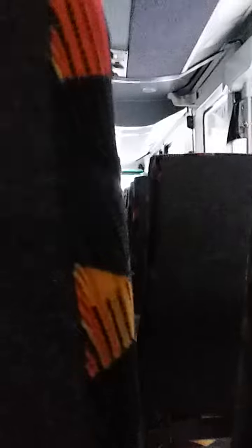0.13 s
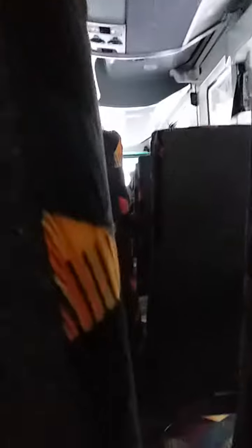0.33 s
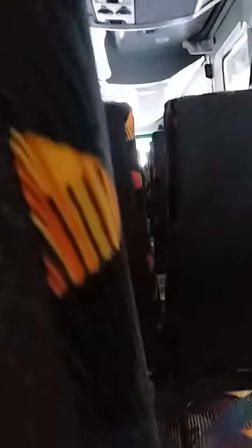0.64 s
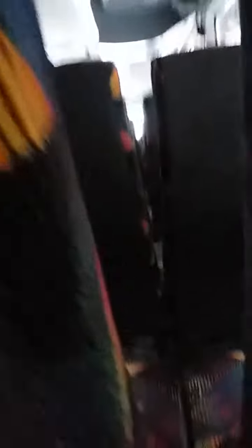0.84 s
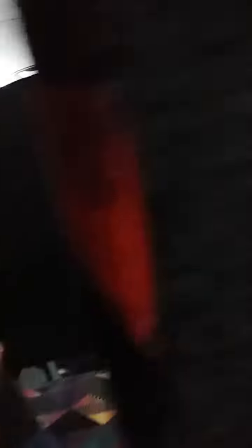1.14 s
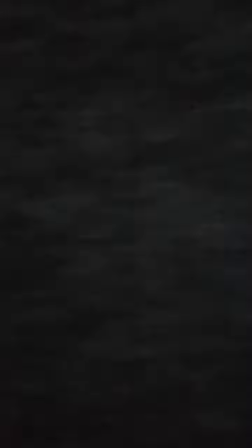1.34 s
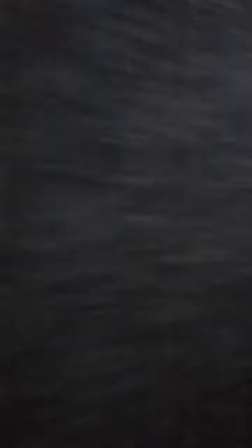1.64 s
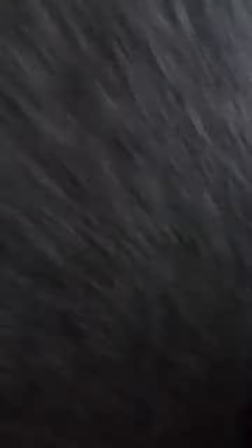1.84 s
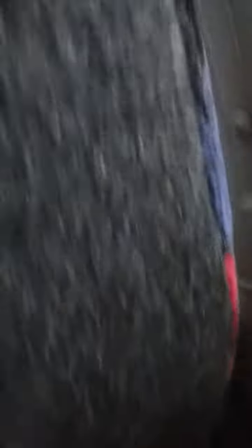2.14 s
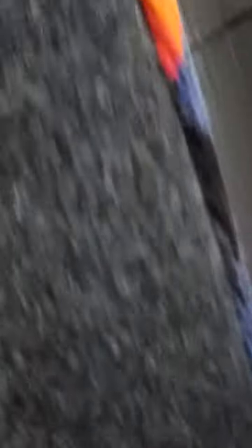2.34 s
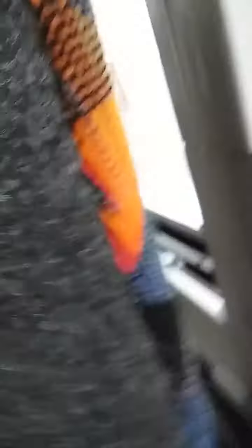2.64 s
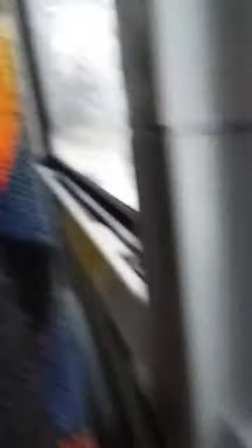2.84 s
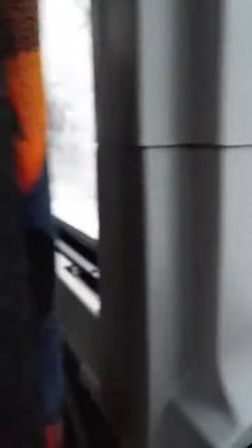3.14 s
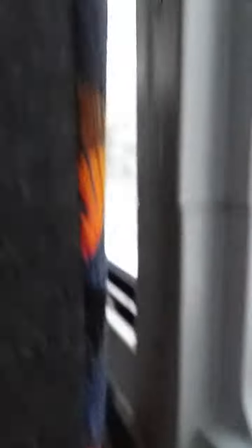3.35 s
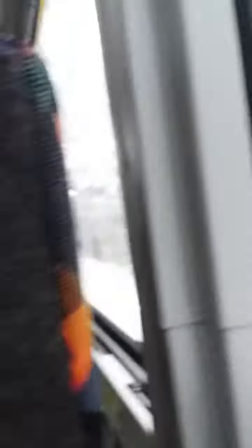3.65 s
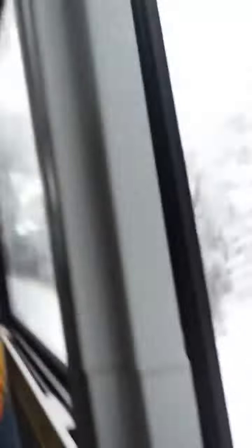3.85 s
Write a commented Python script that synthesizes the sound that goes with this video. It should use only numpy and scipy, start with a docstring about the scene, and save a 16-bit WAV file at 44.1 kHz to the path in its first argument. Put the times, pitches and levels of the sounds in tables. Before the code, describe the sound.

Steady deep engine drone and road rumble inside a coach, with close fabric brushing and small rattles

```python
"""Inside a moving coach, on a left-right microphone pair: silence for about a third of a second, then a fade-in.
A six-cylinder diesel drones as sine orders, with noise for faint whines, road rumble and rushing air.
Cloth brushes a seat close by throughout, as grainy noise. A seat knocks at 1 s and metal clinks at 1.2 s,
both as decaying modes; dry ticks are noise bursts. Thin squeaks of resonant noise come from 2.3 to 3 s,
then a firm rub rasps at 3.3 s and the last ticks fall at 3.6 s."""
import sys
import numpy as np
from scipy import signal
from scipy.io import wavfile

SR = 44100
rng = np.random.default_rng(int(sys.argv[2]) if len(sys.argv) > 2 else 0)


def bounce(signal):
    """Save signal as a 16-bit WAV file at the path given by the first command-line argument."""
    frames = np.transpose(np.atleast_2d(signal))
    limited = np.clip(frames, -1, 1)
    pcm = np.round(limited * 32767).astype(np.int16)
    wavfile.write(sys.argv[1], SR, pcm)


N = 176400
TIME = np.arange(N) / SR


def from_db(db):
    """Decibels to gain."""
    return 10 ** (np.asarray(db) / 20)


def rms_one(x):
    """Scale to unit power."""
    return x / np.sqrt(np.mean(x ** 2) + 1e-20)


def in_time(rows):
    """Read a table of times and values at every sample."""
    return np.interp(TIME, *np.transpose(rows))


def at_hz(points, hz):
    """Read a table on a log-frequency axis."""
    table_hz, value = np.transpose(points)
    return np.interp(np.log(hz), np.log(table_hz), value)


def pan(db):
    """Left and right gains for a left-minus-right difference, at equal power."""
    return rms_one(from_db(np.array([[db], [-db]]) / 2))


def drift(rate):
    """Smooth chance with spread 1; a higher rate (per s) wanders faster."""
    step = 40  # samples between control points
    r = np.exp(-2 * np.pi * rate * step / SR)
    chance = rng.standard_normal(N // step + 2002)
    slow = signal.lfilter([1], [1, -2 * r, r * r], chance)[2000:]  # drop the filter's settling
    return np.interp(np.arange(N) / step, np.arange(len(slow)), rms_one(slow))


def spread(mid, side, alike):
    """Left and right noise whose likeness (correlation) is alike."""
    return np.sqrt(1 + alike) * mid + np.sqrt(1 - alike) * side * [[1], [-1]]


# Likeness of left and right at the microphone pair: pitch_hz, likeness (1 = identical, 0 = unrelated)
LEFT_RIGHT_LIKENESS = [(60,0.95),(130,0.93),(290,0.84),(640,.43),(1410,-0.028),(3100,0.037),(15000,-0.063)]


def banded_noise(spectrum, flicker_db, balance):
    """Narrow bands of stereo noise, each with its own level, flicker and likeness; rms 1."""
    third_octaves = 22 * 2 ** (np.arange(25) / 3)
    edges = np.r_[third_octaves, np.arange(6500, 17000, 1000)]
    white = rng.standard_normal((2, 2, N))
    out = 0
    for k, (low, high) in enumerate(zip(edges, edges[1:])):
        band = signal.butter(3, [low, high], "band", fs=SR, output="sos")
        mid, side = signal.sosfilt(band, white[k % 2])  # neighbouring bands use different noise
        hz = np.sqrt(low * high)
        alike = np.clip(at_hz(LEFT_RIGHT_LIKENESS, hz), -1, 1)
        pan_db = 0 if balance is None else at_hz(balance, hz)
        gain = from_db(at_hz(spectrum, hz) + flicker_db * drift(13.1)) * pan(pan_db)
        out = out + gain * spread(mid, side, alike)
    return rms_one(out)


def resonant_noise(hz, width_hz, alike=0):
    """Stereo noise twice through one resonance; rms 1."""
    r = np.exp(-np.pi * width_hz / SR)
    b, a = [1, 0, -1.08], [1, -2 * r * np.cos(2 * np.pi * hz / SR), r * r]
    once = signal.lfilter(b, a, rng.standard_normal((2, N)))
    mid, side = signal.lfilter(b, a, once)
    return rms_one(spread(mid, side, np.clip(alike, -1, 1)))


def swell(middle, length):
    """A bell-shaped envelope; length is two standard deviations."""
    return np.exp(-2 * ((TIME - middle) / length) ** 2)


def decay(start, t60):
    """A sudden start that falls 60 dB in t60 seconds."""
    return (TIME >= start) * from_db(-60 * np.maximum(TIME - start, 0) / t60)


def struck(contacts, modes, scatter_db):
    """Each contact rings every mode as a decaying sine, set apart in phase left and right by their likeness."""
    out = np.zeros((2, N))
    for start_s, contact_db in contacts:
        start = int(start_s * SR)
        t = TIME[:min(SR // 2, N - start)]
        for hz, mode_db, t60 in modes:
            alike = np.clip(at_hz(LEFT_RIGHT_LIKENESS, hz), -1, 1)
            lag = np.arccos(alike) / 2 * rng.choice([-1, 1])
            chance_db = scatter_db * rng.standard_normal()
            level = from_db(contact_db + mode_db + chance_db - 60 * t / t60)
            out[:, start:start + len(t)] += level * np.sin(2 * np.pi * hz * t + [[lag], [-lag]])
    return out


# Engine speed: time_s, firing_rate_hz
FIRING_RATE = [(0.5,70.48),(1.1,70.41),(1.8,69.65),(2.5,69.4),(4.0,69.28)]
# Other orders of the engine: multiple of the four-stroke cycle rate, level_db (before the swing of the boom)
ENGINE_ORDERS = [(7,-40.5),(8,-43),(9,-33),(10,-32.5),(11,-43.5),(12,-28.5),(13,-36.5),(14,-41.5),(15,-49.5),(16,-43.5),(17,-44),(18,-43),(19,-45),(20,-37),(21,-52),(22,-44.5),(23,-50.5),(24,-48.5),(25,-50.5),(26,-44),(27,-49),(30,-59),(34,-53)]
CYLINDERS = 6
BOOM_WAVER_DB, BOOM_WAVER_PER_S = 1.64, 1.7
ORDER_WAVER, ORDER_WAVER_PER_S = 0.33, 1.61  # share of chance in each order, its pace
ORDERS_FOLLOW, ORDERS_FOLLOW_UP_TO = 0.35, 14  # share of the boom's dB swing, highest multiple that follows


def engine(boom_db):
    """A boom at the firing rate among wavering orders of the engine cycle; low orders swell with the boom."""
    cycle = 2 * np.pi * np.cumsum(in_time(FIRING_RATE)) / SR / CYLINDERS
    boom_level = from_db(boom_db + BOOM_WAVER_DB * drift(BOOM_WAVER_PER_S))
    boom = np.sqrt(2) * boom_level * np.sin(CYLINDERS * cycle)
    effort_db = ORDERS_FOLLOW * (boom_db - boom_db.mean())
    orders = 0
    for multiple, db in ENGINE_ORDERS:
        phase = multiple * cycle + rng.uniform(0, 2 * np.pi)
        chance = drift(ORDER_WAVER_PER_S) * np.sin(phase) + drift(ORDER_WAVER_PER_S) * np.cos(phase)
        gain = from_db(db + effort_db * (multiple <= ORDERS_FOLLOW_UP_TO))
        orders = orders + gain * rms_one(np.sin(phase) + ORDER_WAVER * chance)
    return boom * pan(0.64) + orders


# Strokes of cloth on the seat close by: time_s, level_db (before CLOTH_DB and the grain)
BRUSH_STROKES = [(0.4,-52),(0.63,-81),(0.69,-47),(0.76,-51.5),(0.82,-70),(1.08,-55.5),(1.17,-51),(1.3,-63),(1.47,-52),(1.62,-55),(1.78,-55.5),(1.89,-45.5),(2.0,-49.5),(2.08,-60),(2.24,-62),(2.3,-47),(2.5,-51.5),(2.67,-48),(2.85,-51.5),(3.04,-61),(3.2,-46),(3.29,-46),(3.36,-42.5),(3.41,-52),(3.62,-50.5),(3.8,-55.5),(4.0,-59)]
# Colour of the cloth: pitch_hz, relative level_db per Hz
CLOTH_COLOUR = [(500,-28),(1200,3.5),(2200,8.5),(3400,-1.5),(5500,-0.5),(7000,-2.5),(8000,-4.5),(9400,-16.5),(12500,-9.5),(15800,-14)]
# Firm rubs that rasp: middle_s, length_s, level_db
FIRM_RUBS = [(3.343,0.049,-42)]
CLOTH_DB, CLOTH_PAN_DB = 2.5, -4.5
CLOTH_GRAIN_DB, CLOTH_GRAIN_PER_S = 1.4, 120
RASP_HZ, RASP_WIDTH_HZ, RASP_PAN_DB = 3350, 850, -3


def cloth():
    """Fabric brushing the seat: grainy swishes of banded noise, with resonant noise where a firm rub rasps."""
    level = from_db(CLOTH_DB + in_time(BRUSH_STROKES) + CLOTH_GRAIN_DB * drift(CLOTH_GRAIN_PER_S))
    swish = level * banded_noise(CLOTH_COLOUR, flicker_db=2.7, balance=None)
    rub = sum(from_db(db) * swell(middle, length) for middle, length, db in FIRM_RUBS)
    rasp = rub * resonant_noise(RASP_HZ, RASP_WIDTH_HZ)
    return swish * pan(CLOTH_PAN_DB) + rasp * pan(RASP_PAN_DB)


# Thin squeaks: middle_s, length_s, level_db (of the high tone), pan_db (left minus right)
THIN_SQUEAKS = [(2.303,0.039,-50,-9),(2.477,.018,-50,-3),(2.532,.012,-54,-7),(2.637,0.019,-48,3.5),(2.672,0.011,-36.5,-11),(2.718,.04,-48,-8),(2.98,.012,-52,-10),(2.998,0.014,-54,-15),(3.028,.01,-51,-12)]
SQUEAK_HZ, SQUEAK_LOW_HZ, SQUEAK_WIDTH_HZ = 14620, 7526, 320
SQUEAK_LOW_DB = -7  # low tone against the high one


def squeaks():
    """Short friction squeaks, very high, with a weaker tone about an octave below."""
    high = resonant_noise(SQUEAK_HZ, SQUEAK_WIDTH_HZ)
    low = from_db(SQUEAK_LOW_DB) * resonant_noise(SQUEAK_LOW_HZ, SQUEAK_WIDTH_HZ)
    level = sum(from_db(db) * swell(middle, length) * pan(pan_db)
                for middle, length, db, pan_db in THIN_SQUEAKS)
    return (high + low) * level


# The seat back takes the knock as one heavy thud: start_s, level_db (added to each mode)
SEAT_THUD = [(0.980,0.5)]
# Modes of the seat back: pitch_hz, level_db, t60_s
SEAT_MODES = [(95.4,-15,0.24),(128.8,-7.5,0.18),(162.4,-18,0.13),(216,-17,0.21),(268,-13,0.12)]
# Contacts of the loose seat fitting: start_s, level_db (added to each mode and to the crack)
FITTING_CONTACTS = [(0.979,-3.5),(0.9845,-0.5),(0.988,-3.5),(0.9971,-3),(1.004,-13.5)]
# Modes of the fitting: pitch_hz, level_db, t60_s
FITTING_MODES = [(344.6,-21.5,0.084),(390,-23.5,0.061),(496,-30,0.054),(610,-37,0.047),(1042,-36,0.12),(1230,-32,0.11),(1357,-29,0.14),(1740,-46,0.041),(2000,-41,0.054),(2840,-48,.05),(3000,-41,0.044),(3780,-46,0.039)]
# Colour of the crack on each contact: pitch_hz, relative level_db per Hz
CRACK_COLOUR = [(100,-11),(350,1),(700,-4),(1400,-14),(2500,-8.5),(4000,-21.5),(7500,-28),(9500,-55),(15000,-44)]
CRACK_DB, CRACK_T60_S, KNOCK_PAN_DB = -26.5, 0.066, -1.5
THUD_RISE_S = 0.0056
SCATTER_DB = 2.0  # chance in the level of each struck mode


def knock():
    """A hollow thud of the seat back while a loose fitting chatters, with a noise crack on each contact."""
    rise = np.clip((TIME - SEAT_THUD[0][0]) / THUD_RISE_S, 0, 1)
    thud = struck(SEAT_THUD, SEAT_MODES, SCATTER_DB) * rise
    crack_level = sum(from_db(db) * decay(start, CRACK_T60_S) for start, db in FITTING_CONTACTS)
    crack = crack_level * banded_noise(CRACK_COLOUR, flicker_db=3.0, balance=None)
    chatter = struck(FITTING_CONTACTS, FITTING_MODES, SCATTER_DB)
    return (thud + chatter + from_db(CRACK_DB) * crack) * pan(KNOCK_PAN_DB)


# Contacts of a small metal part: start_s, level_db (added to each mode)
METAL_CONTACTS = [(1.2262,3),(1.229,-1)]
# Modes of the metal part: pitch_hz, level_db, t60_s
METAL_MODES = [(5870,-42,0.035),(7070,-47,0.046),(6970,-35.5,.053),(7420,-40,0.06),(10000,-52,.04),(12540,-39.5,0.063)]
# Dry ticks, including the contact of the clink: start_s, level_db, centre_hz, width_hz
DRY_TICKS = [(1.2262,-36.5,7200,1800),(1.226,-42,13400,4000),(2.4427,-40,11300,3500),(2.449,-45,10500,4500),(2.6664,-47,9400,7000),(3.607,-39,3492,5000),(3.607,-28,600,900)]
CLINK_PAN_DB, TICK_PAN_DB, TICK_T60_S = -10, -2.5, 0.029


def rattles():
    """One metal clink of ringing modes, and a few dry ticks of quickly dying resonant noise."""
    clink = struck(METAL_CONTACTS, METAL_MODES, SCATTER_DB)
    ticks = sum(from_db(db) * decay(start, TICK_T60_S) * resonant_noise(hz, width)
                for start, db, hz, width in DRY_TICKS)
    return clink * pan(CLINK_PAN_DB) + ticks * pan(TICK_PAN_DB)


# Driveline whines: pitch_hz, width_hz, start_level_db, end_level_db
DRIVELINE_WHINES = [(461.4,17.3,-43,-47),(679,22,-51.5,-50.5),(1066.6,17.6,-49.5,-65.5),(1368,29,-53,-59),(1867,45,-62,-57)]


def whines():
    """Faint narrow tones of gears and axle, as resonant noise."""
    return sum(from_db(np.linspace(first_db, last_db, N))
               * resonant_noise(hz, width, at_hz(LEFT_RIGHT_LIKENESS, hz))
               for hz, width, first_db, last_db in DRIVELINE_WHINES)


# Colour of road and wind noise: pitch_hz, relative level_db per Hz
ROAD_COLOUR = [(25,-17),(40,-19.5),(60,-1),(85,-2),(115,0),(150,-3),(200,-7),(280,-14),(360,-15.5),(460,-18),(560,-23),(700,-22),(1000,-26),(1900,-28),(2500,-35.5),(3300,-41.5),(5000,-44),(7000,-46),(8000,-48.5),(9400,-61.5),(13500,-51),(15800,-61)]
# Road noise across the microphone pair: pitch_hz, left_minus_right_db
ROAD_BALANCE = [(60,2.2),(130,0.5),(500,4.8),(1200,-2.5),(3000,-2),(12000,-2.5)]
ROAD_DB, ROAD_FLICKER_DB = -28.5, 1.2
ROAD_FOLLOWS = 0.033  # share of the boom's dB swing


def road(boom_db):
    """Tyre rumble and wind through the body, growing a little with the engine's effort."""
    level = from_db(ROAD_DB + ROAD_FOLLOWS * (boom_db - boom_db.mean()))
    return level * banded_noise(ROAD_COLOUR, ROAD_FLICKER_DB, ROAD_BALANCE)


# Rushing air around 2 kHz: time_s, level_db
AIR_LEVEL = [(0.5,-45.5),(0.75,-55.5),(1.3,-55.5),(1.95,-46),(2.15,-54),(2.4,-42.5),(2.65,-45),(3.0,-50),(3.55,-47.5),(4.0,-48.5)]
RUSH_HZ, RUSH_WIDTH_HZ = 2090, 1130


def rush():
    """Air rushing past the windows: broad resonant noise, swelling and easing."""
    return from_db(in_time(AIR_LEVEL)) * resonant_noise(RUSH_HZ, RUSH_WIDTH_HZ, alike=-0.16) * pan(-1.7)


# Boom of the engine at its firing rate: time_s, level_db (before its waver)
BOOM_LEVEL = [(0.4,-25),(0.7,-32.5),(1.4,-29.5),(1.9,-26),(2.4,-25),(2.8,-26),(3.3,-22),(3.6,-25),(3.82,-20),(4.0,-25)]


def scene():
    """Everything heard from the seat."""
    boom_db = in_time(BOOM_LEVEL)
    driving = engine(boom_db) + whines() + road(boom_db) + rush()
    return driving + cloth() + squeaks() + knock() + rattles()


# The opening fade, silent before its first row: time_s, level_db
OPENING_FADE = [(0.362,-100),(0.374,-25.5),(0.405,-18.5),(0.42,-12.5),(0.49,-6.5),(0.57,-3.5),(0.65,1)]
LOW_CUT_HZ, CUTOFF_HZ = 53, 15900


def record(dry):
    """The sound fades in; the deepest bass and the top are cut."""
    low_cut = signal.butter(3, LOW_CUT_HZ, "high", fs=SR, output="sos")
    thinned = signal.sosfilt(low_cut, dry)
    opened = thinned * from_db(in_time(OPENING_FADE)) * (TIME > OPENING_FADE[0][0])
    top_cut = signal.ellip(12, .1, 90, CUTOFF_HZ, fs=SR, output="sos")
    return signal.sosfilt(top_cut, opened)


dry = scene()
out = record(dry)
bounce(out)
```